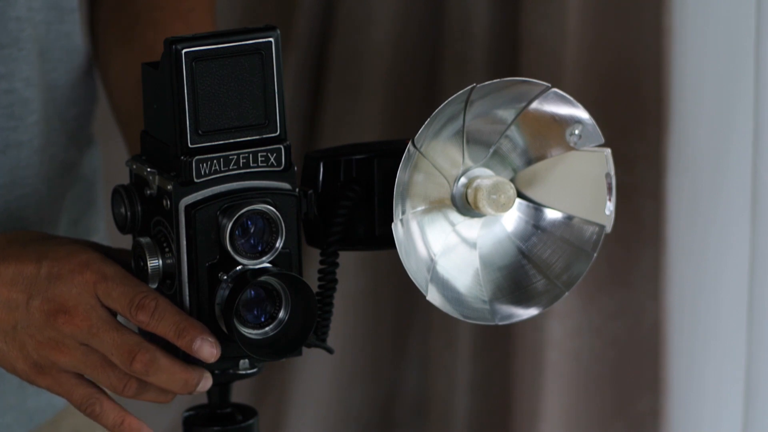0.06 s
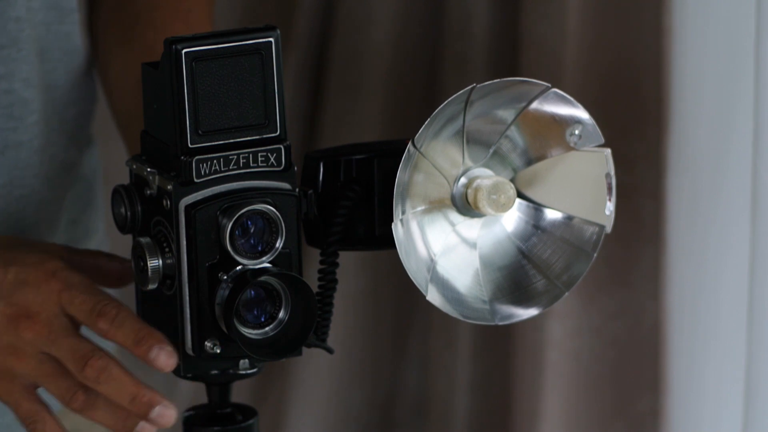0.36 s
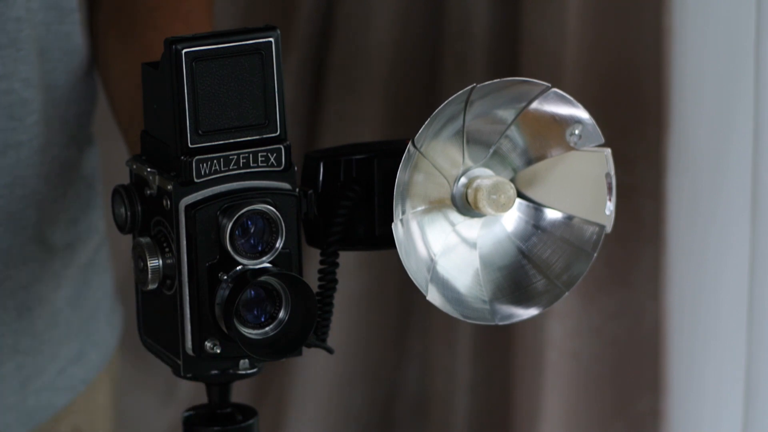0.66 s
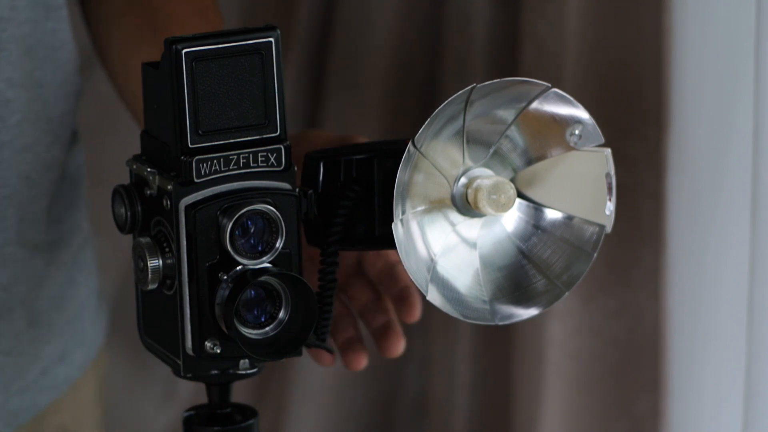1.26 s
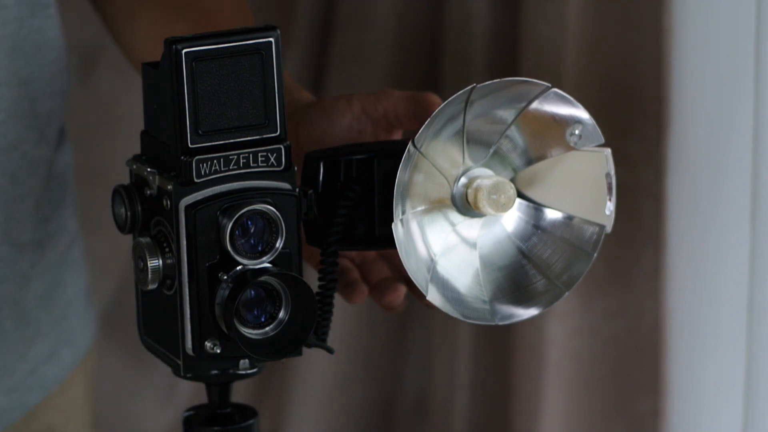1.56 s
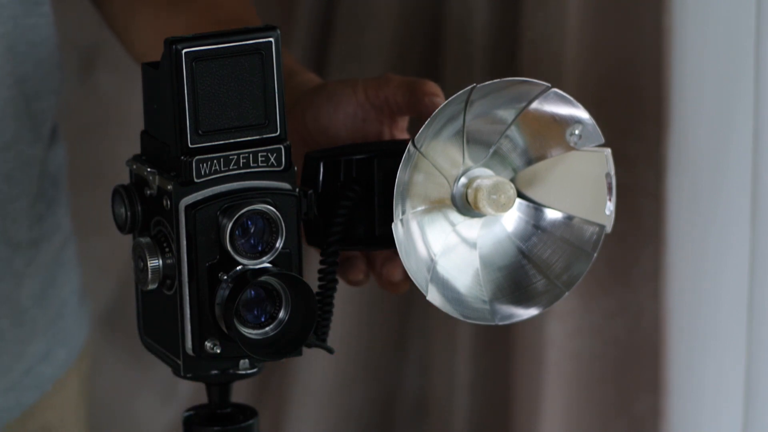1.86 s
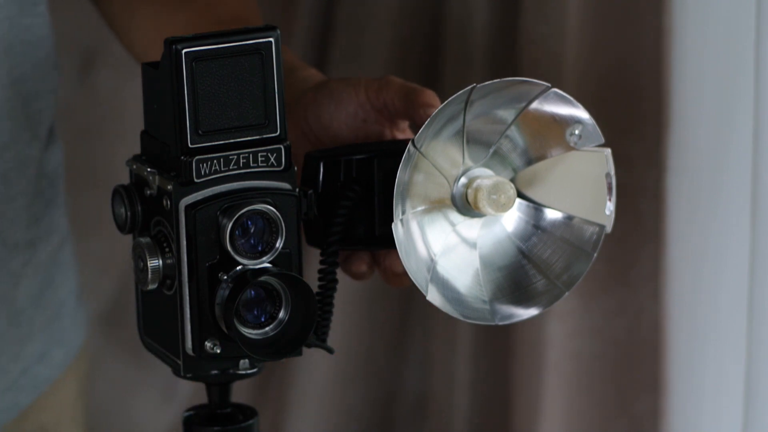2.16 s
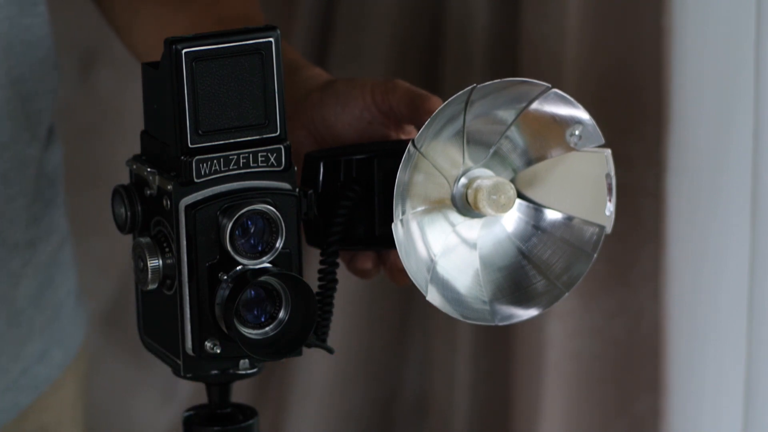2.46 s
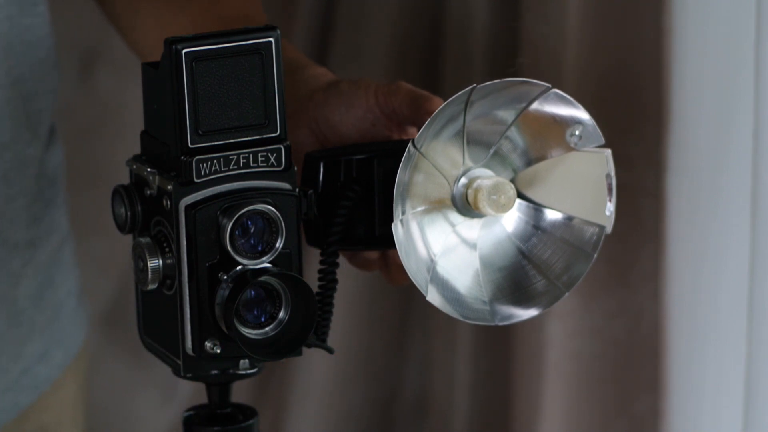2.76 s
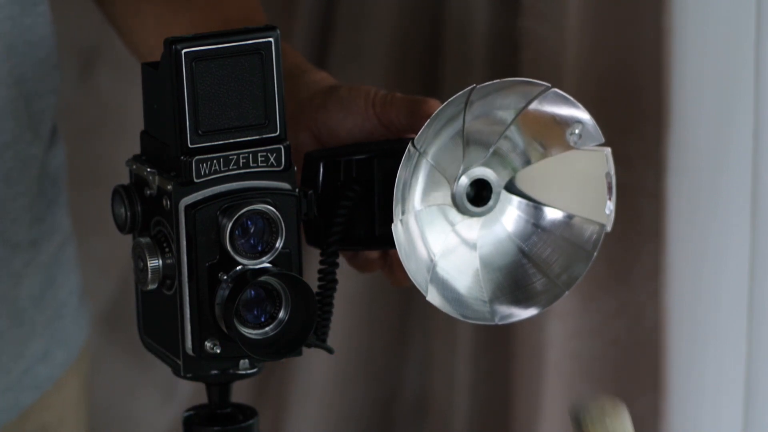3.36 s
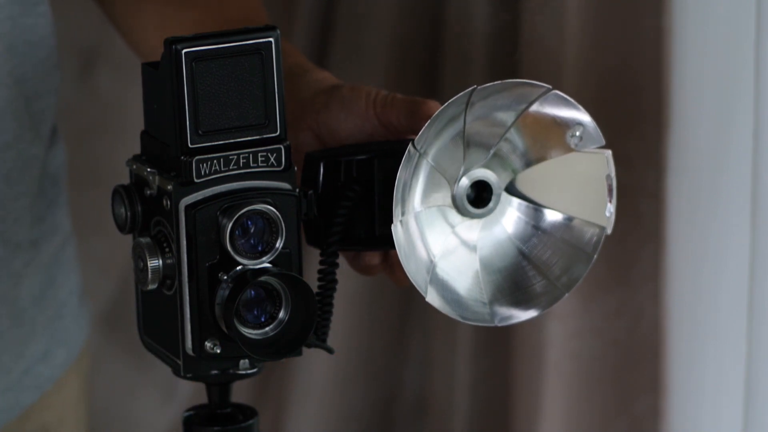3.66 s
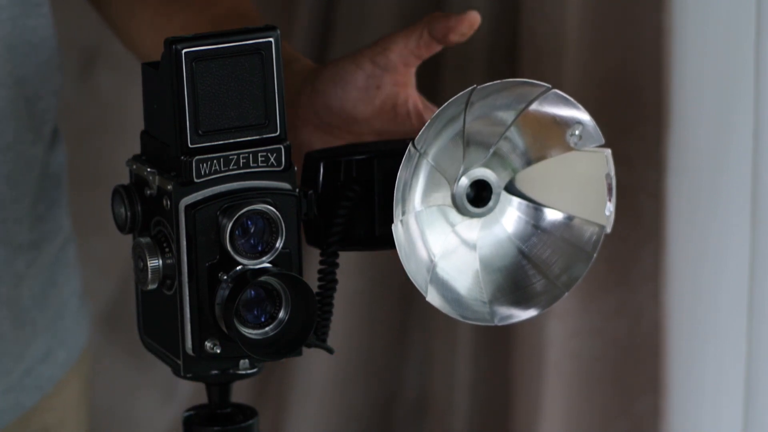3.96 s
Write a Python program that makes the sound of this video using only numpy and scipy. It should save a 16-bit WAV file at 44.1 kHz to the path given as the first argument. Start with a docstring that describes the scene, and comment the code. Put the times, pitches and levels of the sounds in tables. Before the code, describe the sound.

A flashgun ejects its bulb in a quiet, hard-walled room. For three seconds there is only soft hiss with faint finger ticks, near 0.5, 1.3 and 2.4 seconds. At 3.2 a dull button click leads straight into a bright spring snap with a short metallic ring. At 3.7 the bulb lands with a knock, rattles, bounces twice and rings. Snap and knock arrive mostly as brief room echo.

```python
"""A spring drives a spent bulb out of a flashgun: the base sticks and slips in its socket, ending in a
bright snap that sets the spring and reflector ringing. Before this, fingers tick on the housing and press
the release. Under half a second after the snap the bulb lands out of sight with a knock, rattles and rings
in its natural modes. Snap and knock arrive mostly as reverberation from the hard walls of a quiet room,
over a soft hiss."""
import sys
import numpy as np
from scipy import signal
from scipy.fft import rfft, irfft
from scipy.io import wavfile

SR = 44100
rng = np.random.default_rng(int(sys.argv[2]) if len(sys.argv) > 2 else 0)


def bounce(signal):
    """Save signal as a 16-bit WAV file at the path given by the first command-line argument."""
    frames = np.transpose(np.atleast_2d(signal))
    limited = np.clip(frames, -1, 1)
    pcm = np.round(limited * 32767).astype(np.int16)
    wavfile.write(sys.argv[1], SR, pcm)


N = 176400

# spectrum of the background hiss (frequency [Hz], level [dB])
AIR_SPECTRUM = [(18, -68), (30, -37), (69, -17.5), (133, -6.5), (173, -3.5), (292, 0), (443, -1),
                (1170, -1.5), (1260, -3.5), (2300, -3), (2490, -4.5), (9190, -14), (11000, -16.5),
                (14000, -21.5), (15500, -10.5)]
# likeness of the hiss in the two channels (frequency [Hz], correlation [1])
AIR_CORRELATION = [(60, 0.19), (300, 0.23), (1000, 0.29), (2500, 0.16), (6000, 0.052), (15000, 0.017)]
# slow drift of the hiss (time [s], level [dB])
AIR_LEVEL = [(0, -56.5), (.45, -58.5), (.7, -57.5), (1.25, -59.5), (1.5, -58.5), (2.35, -61.5), (2.5, -60),
             (3.2, -62.5), (3.448, -57), (3.7, -58), (4, -60)]
# reverberation time before an added fade that makes the echo die away abruptly (frequency [Hz], T60 [s])
ROOM_T60 = [(250, 0.26), (900, 0.25), (2000, 0.57), (4500, 0.61), (8000, 0.73), (11000, 0.54),
            (15000, 0.44)]
# likeness of the reflections in the two channels (frequency [Hz], correlation [1])
ROOM_CORRELATION = [(200, 0.86), (700, 0.59), (1300, 0.63), (2400, 0.34), (4400, 0), (9000, 0.032)]
# finger ticks on the housing
# (time [s], frequency [Hz], bandwidth [Hz], level [dB], left minus right [dB], reflections re tick [dB])
FINGER_TICKS = [(0.545, 13900, 4970, -35.5, -9, 4.5), (1.3159, 10700, 1300, -34, -14, -2),
                (1.4398, 13600, 5000, -44, -1, 5), (1.6444, 11100, 5000, -45, -1, 2.5),
                (2.4174, 11300, 1100, -29, 13, 2), (2.4182, 11150, 1100, -29.5, 8, 2),
                (2.9358, 6340, 770, -42.5, -16, 2)]
# dull clicks of the release button (time [s], level [dB])
BUTTON_CLICKS = [(3.2303, -27), (3.2428, -32.5)]
# the bulb lands, rattles and bounces twice (time [s], relative level [dB], relative thud level [dB])
LANDINGS = [(3.7275, -12, -11.5), (3.7441, -14, -15), (3.7507, -14.5, -8), (3.7591, -14, -10),
            (3.783, -18.5, -16), (3.805, -30, -18.5), (3.854, -24, -43), (3.888, -35, -36)]
# spectrum of the first knock (frequency [Hz], level [dB])
KNOCK_SPECTRUM = [(470, -53), (800, -11), (973, -6.5), (1100, -8), (1360, 4.5), (1510, -4.5), (1570, -8),
                  (1890, -2), (2060, 0.5), (2240, -1), (2600, 1), (3320, -2.5), (3660, -1), (4400, -5.5),
                  (6130, -9.5), (7550, -5.5), (15000, -17)]
# modes of the bulb and what it strikes (frequency [Hz], level [dB], T60 [s])
BULB_MODES = [(1364, 2.5, 0.38), (1560, -5, 0.57), (1620, -0.5, 0.46), (1725, -5, 0.65), (1810, -5.5, 0.58),
              (1970, -4, 0.54), (2130, 3.5, .3), (2400, 2.5, 0.45), (2498, 1.5, 0.36), (2700, 2.5, .45),
              (2770, 3, 0.15), (2960, 0.5, 0.58), (3083, -4.5, 0.66), (3160, -4.5, .62)]
# low resonances of the surface it lands on (frequency [Hz], bandwidth [Hz], level [dB])
SURFACE_MODES = [(257, 53, -4.5), (334, 58, 1), (387, 42, -1.5), (597, 68, -2.5), (694, 57, -1.5),
                 (952, 107, 8)]
# the bulb's base slips in its socket until the spring hits its stop (time [s], relative level [dB])
SLIPS = [(3.2655, -29), (3.272, -20), (3.2805, -20.5), (3.2875, -9), (3.2953, -12.5)]
# spectrum of the snap (frequency [Hz], level [dB])
SNAP_SPECTRUM = [(530, -52), (900, -31), (1050, -31), (1150, -22), (1230, -17), (1370, -6.5), (1690, -7.5),
                 (1830, -5), (2010, -5.5), (2450, -6.5), (2950, -8.5), (4230, -2.5), (5460, 0),
                 (7470, -8.5), (7920, -5), (9540, -6), (10600, -2.5), (12900, -3.5), (14500, -6.5)]
# modes of the spring and reflector (frequency [Hz], level [dB], T60 [s])
SPRING_MODES = [(1802, -3, 0.34), (1864, -2.5, 0.35), (3886, 0.5, 0.39), (4770, -1, 0.45),
                (4724, -2.5, 0.53), (4935, -4, 0.62), (5364, -0.5, 0.46), (5617, 2, 0.32), (6000, 0, 0.37),
                (10700, 1, 0.26)]

ROOM_BUILD_S, TAIL_FADE_S = 0.004, 0.12  # beyond the fade time the tail falls ever faster
CONTACT_RISE_S = 0.0011
FLUTTER_DEPTH, FLUTTER_HZ = 1.17, 129.7
TICK_TAIL_S, TICK_BUILD_S, TICK_TAIL_WIDENING = 0.014, 0.014, 2.4  # nearby reflections of a tick
BUTTON_HZ, BUTTON_WIDTH_HZ, BUTTON_ROOM_DB = 1290, 520, -2.5
KNOCK_DB, KNOCK_DIRECT_DB, KNOCK_CRACK_S, BULB_RING_DB = 17, -7, 0.029, 8.5
DULLING_DB_PER_OCTAVE_PER_S, DULL_ABOVE_HZ = 67, 3700  # treble lost as the bulb settles
THUD_DB, THUD_ROOM_DB, THUD_LOW_HZ = -2.5, 3.5, 212
BUMP_DB, BUMP_HZ, BUMP_WIDTH_HZ = -30.5, 140, 130
SNAP_DB, SNAP_DIRECT_DB, SNAP_CRACK_S, SPRING_RING_DB = 15, -11, 0.0064, 0.5
SNAP_TOP_HZ, TOP_HZ, BULB_BALANCE_DB = 14900, 15650, -0.7


def undb(db):
    """Amplitude ratio for a level in decibels."""
    return 10 ** (np.asarray(db) / 20)


def unit(x):
    """Normalise to a mean energy of one per channel."""
    return x / np.sqrt(np.mean(np.sum(x ** 2, axis=-1)))


def across(points, hz):
    """Interpolate (frequency, value) points on a log-frequency axis."""
    freqs, values = np.array(points, float).T
    return np.interp(np.log(np.maximum(hz, 1)), np.log(freqs), values)


def clock(size=SR):
    """Sample times in seconds."""
    return np.arange(size) / SR


def pan(db):
    """Left and right gains: a level difference gives direction."""
    return undb(np.array([[db], [-db]]) / 2)


def add(out, start, sound):
    """Superpose a sound from a start time in seconds."""
    i = int(start * SR)
    n = min(sound.shape[-1], N - i)
    out[:, i:i + n] += sound[..., :n]


def convolve(x, y):
    """Convolution passes a sound through a linear system's impulse response."""
    return signal.fftconvolve(np.atleast_2d(x), np.atleast_2d(y), axes=-1)[:, :x.shape[-1]]


def cut(x, hz, kind, order=4):
    """Butterworth high-pass or low-pass."""
    return signal.sosfilt(signal.butter(order, hz, kind, fs=SR, output="sos"), x)


def minimum_phase(spectrum, size=2048):
    """Folding the cepstrum gives a causal impulse response with the given spectral shape."""
    magnitude = undb(across(spectrum, np.fft.rfftfreq(size, 1 / SR)))
    cepstrum = irfft(np.log(magnitude))
    cepstrum[1:size // 2] *= 2
    cepstrum[size // 2 + 1:] = 0
    return unit(irfft(np.exp(rfft(cepstrum))))


def resonance(hz, width_hz):
    """Impulse response of a steep, damped resonator."""
    t = clock()
    return unit(t * np.exp(-np.pi * width_hz * t) * np.sin(2 * np.pi * hz * t))


def stereo_noise(correlation, size=SR):
    """White noise whose ratio of mid to side power sets the left-right correlation."""
    alike = np.clip(across(correlation, np.fft.rfftfreq(size, 1 / SR)), -.98, .98)
    mid, side = rfft(rng.standard_normal((2, size)))
    mid, side = mid * np.sqrt((1 + alike) / 2), side * np.sqrt((1 - alike) / 2)
    return irfft(np.array([mid + side, mid - side]), size)


def waver(rate_hz):
    """Random modulation of amplitude and phase, with a spread near one."""
    real, imag = (np.interp(clock() * rate_hz, np.arange(SR), v) for v in rng.standard_normal((2, SR)))
    return real + 1j * imag


def air():
    """Ambient noise: a soft, filtered hiss that slowly rises and falls."""
    hiss = convolve(stereo_noise(AIR_CORRELATION, size=N), minimum_phase(AIR_SPECTRUM))
    return hiss * undb(np.interp(clock(size=N), *np.array(AIR_LEVEL).T))


def room(bands=20):
    """Reverberation: reflections build up and decay band by band; an added fade cuts the tail short."""
    t, hz = clock(), np.fft.rfftfreq(SR, 1 / SR)
    noise = rfft(stereo_noise(ROOM_CORRELATION))
    centres, tail = np.geomspace(100, 16000, bands), 0
    for centre, weights in zip(centres, np.eye(bands)):
        band = irfft(noise * across(list(zip(centres, weights)), hz))
        tail = tail + band * np.exp(-np.log(1000) * t / across(ROOM_T60, centre))
    return unit(tail * (1 - np.exp(-t / ROOM_BUILD_S)) * np.exp(-(t / TAIL_FADE_S) ** 2))


def burst(decay_s, rise_s=CONTACT_RISE_S):
    """A broadband transient: exponentially decaying noise, for a hard contact or its nearby echoes."""
    t = clock()
    return unit(stereo_noise(ROOM_CORRELATION) * np.exp(-t / decay_s) * (1 - np.exp(-t / rise_s)))


def ring(modes, blows):
    """Free vibration: each blow adds energy to damped modes; interfering reflections make them flutter."""
    t, out = clock(), 0
    strikes = [(t + blows[0][0] - blow[0], undb(blow[1])) for blow in blows]
    for hz, db, t60 in modes:
        energy = sum((age >= 0) * (gain * np.exp(-np.log(1000) * abs(age) / t60)) ** 2
                     for age, gain in strikes)
        side = np.sqrt(np.clip(1 - across(ROOM_CORRELATION, hz), 0, 1)) * np.array([[1], [-1]])
        flutter = 1 + FLUTTER_DEPTH * (waver(FLUTTER_HZ) + side * waver(FLUTTER_HZ))
        tone = np.exp(2j * np.pi * (hz * t + rng.random()))
        out = out + undb(db) * np.sqrt(energy) * np.imag(flutter * tone)
    return unit(out * (1 - np.exp(-t / CONTACT_RISE_S)))


def fingers():
    """Impulse excitation: each tick rings a high resonance of the housing, trailed by early echoes."""
    out = np.zeros((2, N))
    for start, hz, width_hz, db, side_db, tail_db in FINGER_TICKS:
        direct = resonance(hz, width_hz) * pan(side_db)
        reflections = burst(TICK_TAIL_S, rise_s=TICK_BUILD_S)
        tail = convolve(reflections, resonance(hz, width_hz * TICK_TAIL_WIDENING))
        add(out, start, undb(db) * (direct + undb(tail_db) * tail))
    return out


def release_button():
    """Heavy damping: the button's resonance dies quickly, so each contact is a dull click."""
    out, body = np.zeros((2, N)), resonance(BUTTON_HZ, BUTTON_WIDTH_HZ)
    for start, db in BUTTON_CLICKS:
        contact = burst(decay_s=0.0046) + undb(BUTTON_ROOM_DB) * room()
        add(out, start, undb(db) * convolve(contact, body))
    return out


def bulb_landing():
    """Impact excitation: each contact drives the modes of bulb and surface; later knocks are duller."""
    out, first = np.zeros((2, N)), LANDINGS[0][0]
    surface = sum(undb(db) * resonance(hz, width_hz) for hz, width_hz, db in SURFACE_MODES)
    surface = unit(cut(surface, THUD_LOW_HZ, "high"))
    for start, db, thud_db in LANDINGS:
        db_per_octave = DULLING_DB_PER_OCTAVE_PER_S * (start - first)
        spectrum = [(hz, level - db_per_octave * max(np.log2(hz / DULL_ABOVE_HZ), 0))
                    for hz, level in KNOCK_SPECTRUM]
        walls = room()
        contact = undb(KNOCK_DIRECT_DB) * burst(KNOCK_CRACK_S) + walls
        add(out, start, undb(KNOCK_DB + db) * convolve(contact, minimum_phase(spectrum)))
        thud = surface + undb(THUD_ROOM_DB) * unit(convolve(walls, surface))
        add(out, start, undb(THUD_DB + thud_db) * thud)
    add(out, first, undb(BULB_RING_DB) * ring(BULB_MODES, LANDINGS))
    add(out, first, undb(BUMP_DB) * resonance(BUMP_HZ, BUMP_WIDTH_HZ))
    return out


def bulb_ejection():
    """Stick-slip friction: a quick run of slips ends in the snap; the spring and reflector ring on."""
    out = np.zeros((2, N))
    body = cut(minimum_phase(SNAP_SPECTRUM), SNAP_TOP_HZ, "low", order=2)
    for start, db in SLIPS:
        contact = undb(SNAP_DIRECT_DB) * burst(SNAP_CRACK_S) + room()
        add(out, start, undb(SNAP_DB + db) * convolve(contact, body))
    add(out, SLIPS[0][0], undb(SPRING_RING_DB) * ring(SPRING_MODES, SLIPS))
    return out


def scene():
    """Superposition: the pressures of hiss, handling, ejection and landing add."""
    background = air() + fingers() + release_button()
    return background + (bulb_ejection() + bulb_landing()) * pan(BULB_BALANCE_DB)


def record(dry):
    """Band limiting: a steep elliptic low-pass removes the top of the treble."""
    return signal.sosfilt(signal.ellip(10, .2, 80, TOP_HZ, fs=SR, output="sos"), dry)


dry = scene()
out = record(dry)
bounce(out)
```